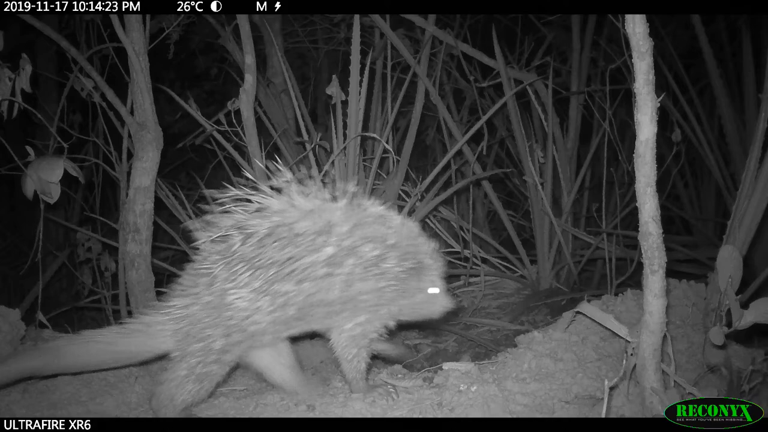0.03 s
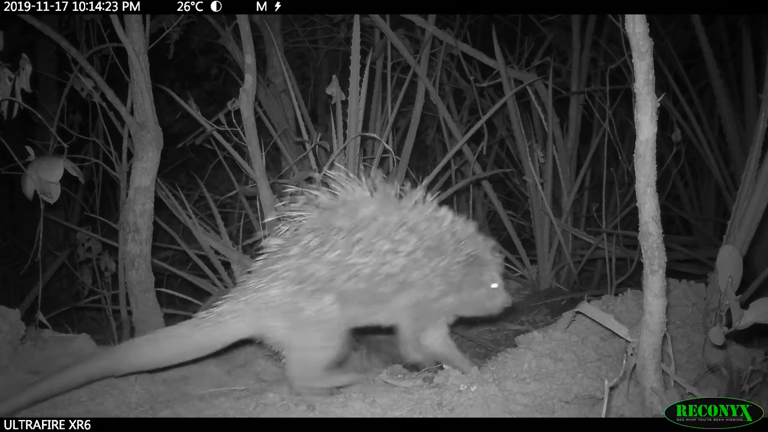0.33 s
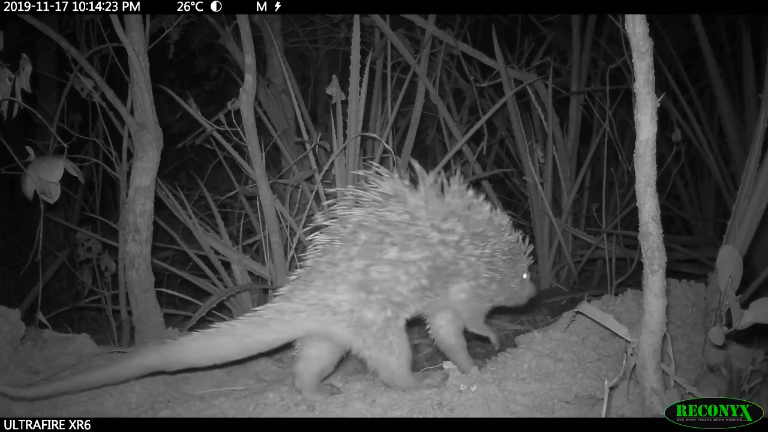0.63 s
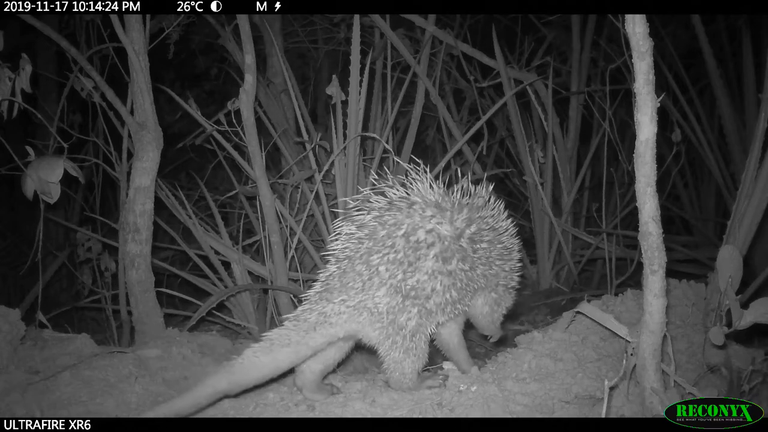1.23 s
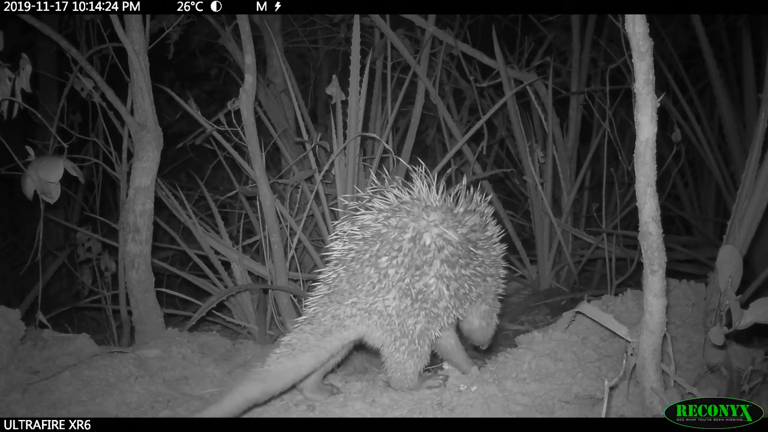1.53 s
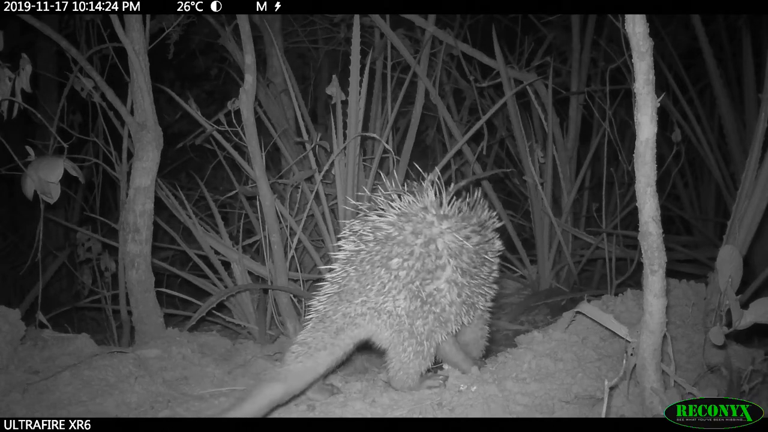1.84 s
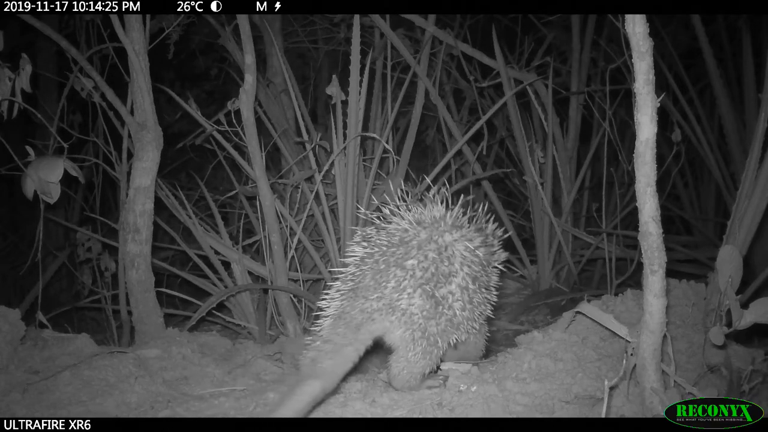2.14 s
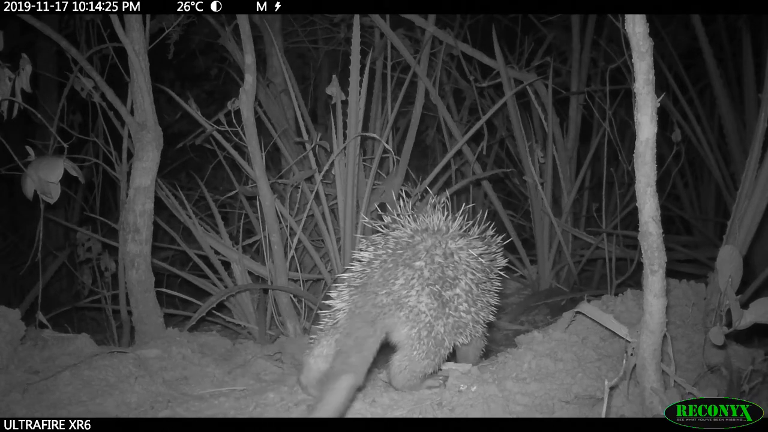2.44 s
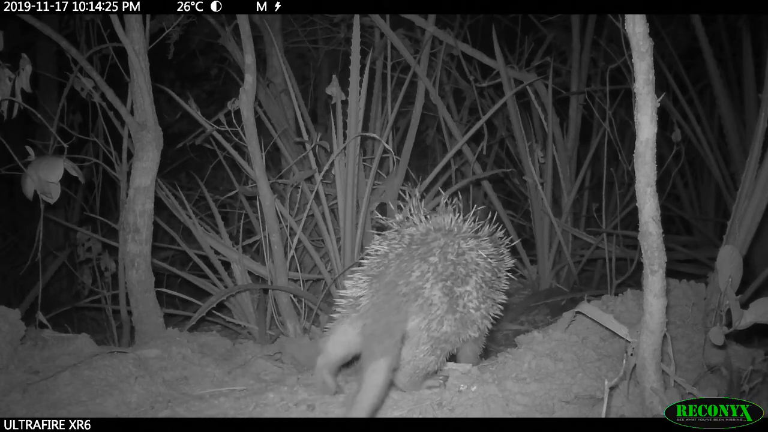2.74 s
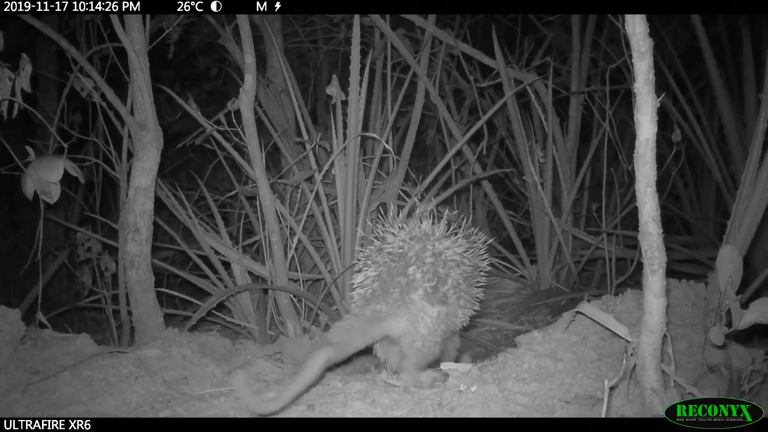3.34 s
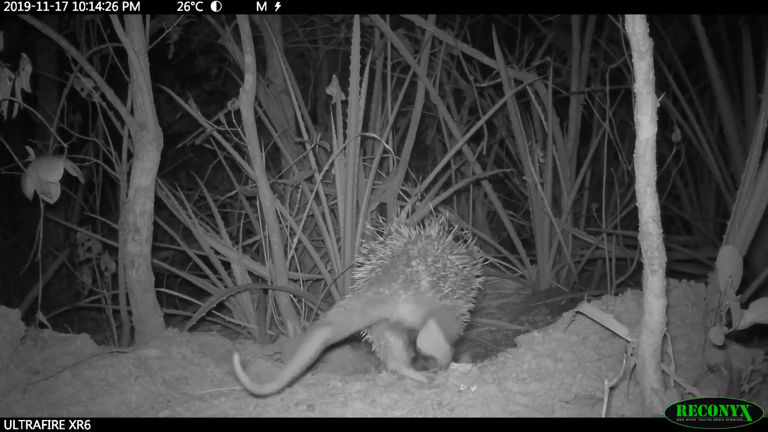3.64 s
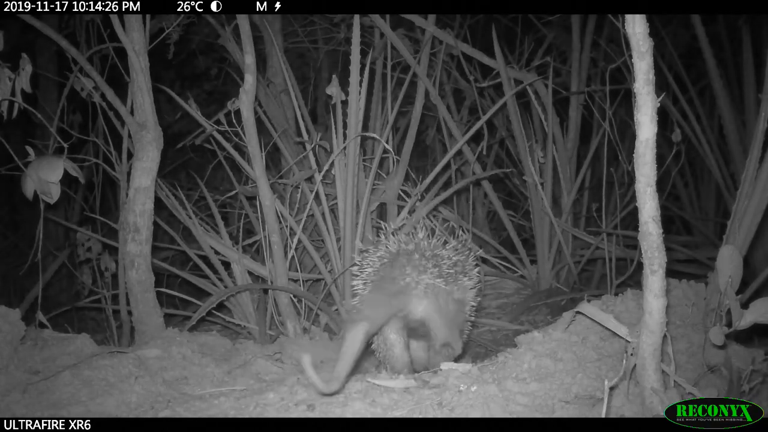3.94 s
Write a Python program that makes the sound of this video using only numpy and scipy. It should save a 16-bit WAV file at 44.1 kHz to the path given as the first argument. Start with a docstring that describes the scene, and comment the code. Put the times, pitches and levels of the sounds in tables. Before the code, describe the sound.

A chorus of crickets pulses near and far outdoors at night, starting with a soft microphone thump. A porcupine's feet and tail brush lightly through dry litter close by, ending in one short, sharp snap.

```python
"""A soft thump as a trail camera switches on, then a forest at night: three near crickets trill in
overlapping waves and a lower one purrs further off, each wing stroke a short tone. A distant chorus,
a high insect hiss and a low rush of air lie behind them. A porcupine shuffles away over dry litter,
its feet and tail brushing out grainy noise, and near the end something brittle snaps and briefly rings."""
import sys
import numpy as np
from scipy import signal
from scipy.fft import rfft, irfft, next_fast_len
from scipy.io import wavfile
from scipy.ndimage import map_coordinates

SR = 44100
rng = np.random.default_rng(int(sys.argv[2]) if len(sys.argv) > 2 else 0)


def generate_wav(signal):
    """Clip the signal to [-1, 1] and save it as 16-bit WAV at the path in sys.argv[1]."""
    frames = np.transpose(np.atleast_2d(signal))
    scaled = np.clip(frames, -1, 1) * 32767
    pcm = np.round(scaled).astype(np.int16)
    wavfile.write(sys.argv[1], SR, pcm)


N = 176400
T = np.arange(N) / SR

# Spectra of the noise sources. Each row: frequency in Hz, relative level in dB.
AIR_SPECTRUM = [(20, 28), (35, 8.5), (60, 17.5), (120, 6), (200, 3.5), (340, 2), (500, -1), (1200, -4),
                (2400, -5.5), (5000, -7), (10000, -8), (15000, -8.5)]
HISS_SPECTRUM = [(5000, -24), (8000, -4), (10000, -3), (12000, 0), (13500, 0), (15000, 2), (16000, -2.5)]
LITTER_SPECTRUM = [(700, -37), (2600, -8), (4000, -7.5), (5500, 7.5), (7500, 5), (10000, -8.5),
                   (15000, -32)]
SOIL_SPECTRUM = [(200, -13), (700, 1), (1400, 3.5), (2600, 2.5), (4000, -8), (7000, 8), (15000, -20)]
FOOTFALL_SPECTRUM = [(100, -52), (250, -4), (350, 4), (600, -17), (1100, -8), (2000, -23), (5000, -28)]
# Distant crowds of crickets. Each row: pitch in Hz, spread in Hz, level in dB, pulses per second.
CROWDS = [(2926, 64, -60, 24), (3110, 143, -61.5, 45), (3500, 110, -57.5, 37), (5870, 51, -62.5, 180),
          (6330, 150, -56, 24), (6664, 160, -51, 64), (7180, 110, -59, 100)]
# Calls of a hissing bush cricket and of a thin, very high insect.
# Each row: start in seconds, length in seconds, level in dB.
HISS_BOUTS = [(-.45, 0.74, -55), (.81, 0.62, -57), (2.15, .82, -56.5), (3.55, .8, -54.5)]
WHISTLES = [(-.45, .92, -66.5), (1.012, 0.81, -63.5), (2.452, 0.92, -65)]
# Feet and tail brushing the litter. Each row: middle in seconds, half length in seconds,
# level of the leaves in dB, level of the soil relative to the leaves in dB.
SHUFFLES = [(0.163, 0.072, -61.5, 0.5), (0.333, 0.02, -52, -9), (0.744, 0.039, -59, -18),
            (3.15, 0.027, -55.5, -13), (3.487, 0.025, -49, -1.5), (3.54, 0.011, -48.5, -5.5),
            (3.604, 0.027, -45.5, -7.5), (3.658, 0.0041, -52.5, -4), (3.751, 0.0055, -59, 7),
            (3.794, .014, -55.5, -7), (3.848, 0.0038, -52, -12)]
# Ticks of leaves and grit. Each row: start in seconds, level in dB.
TICKS = [(.1262, -45), (0.3245, -44), (.7265, -44), (2.9665, -45.5), (3.4817, -46), (3.5018, -38),
         (3.575, -38), (3.7707, -40)]
# A soft step on earth. One row: middle in seconds, half length in seconds, level in dB.
FOOTFALL = (3.11, 0.032, -57.5)
# The cracks of the snap and their echo. Each row: start in seconds, level in dB.
CRACKS = [(3.8868, -10.5), (3.8875, -16), (3.891, -27), (3.8958, -27.5)]
# Modes of the snap. Each row: frequency in Hz, relative level in dB, time to fall 60 dB in seconds.
SNAP_MODES = [(1460, -35, 0.014), (3500, -48, 0.0011), (4700, -36, 0.0047), (5280, -14, 0.0067),
              (6685, 3, 0.0065), (8200, -3, 0.0017), (9800, -45, .003)]
# Trills of the nearest cricket, a higher one, a softer neighbour and the low one.
# Each row: start in seconds, length in seconds, base level in dB.
LEAD_TRILLS = [(.345, 1.03, -41), (1.6, 0.86, -45), (2.845, 0.88, -47.5)]
HIGH_TRILLS = [(-.6, 0.75, -38.5), (.66, 0.85, -44.5), (1.93, 0.82, -46.5), (3.18, .86, -50)]
SOFT_TRILLS = [(.72, 0.52, -48), (2.12, 0.99, -50.5), (3.72, 0.67, -57.5)]
LOW_TRILLS = [(0, 1.04, -54.5), (1.15, 1, -54.5), (2.34, 0.706, -54), (3.06, 0.565, -59), (3.72, 0.25, -54)]


def amp(db):
    """Amplitude grows tenfold for every 20 dB."""
    return 10 ** (np.asarray(db) / 20)


def unit(x):
    """Normalisation to an rms of 1."""
    return x / np.sqrt(np.mean(x ** 2) + 1e-20)


def wobble(rate):
    """Smooth random modulation through `rate` knots per second."""
    return map_coordinates(rng.standard_normal(4096), [T * rate], mode="wrap")


def filtered(x, response):
    """Linear filtering: the spectrum times a frequency response."""
    size = next_fast_len(N + SR // 2)
    return irfft(rfft(x, size) * response(np.fft.rfftfreq(size, 1 / SR)), size)[..., :N]


def coloured(x, spectrum):
    """Spectral shaping through (Hz, dB) points, at an rms of 1."""
    f, db = np.transpose(spectrum)
    return unit(filtered(x, lambda hz: amp(np.interp(np.log(hz + 1), np.log(f), db))))


def noise(width):
    """Mid-side stereo white noise; width is the ratio of side to mid."""
    mid, side = rng.standard_normal((2, N))
    return unit(np.array([mid + width * side, mid - width * side]))


def gate(start, length, attack_s, release_s):
    """A trapezoidal envelope: attack, hold and release."""
    return np.clip((T - start) / attack_s, 0, 1) * np.clip((start + length - T) / release_s, 0, 1)


def swell(middle, half, db):
    """A Gaussian envelope for one stroke."""
    return amp(db) * np.exp(-.5 * ((T - middle) / half) ** 2)


def undergrowth(x, wet_db, t60, width):
    """Scattering from stems and leaves adds a decaying tail to the direct sound."""
    tail = (noise(width) * amp(-60 * T / t60))[:, :SR // 2]
    tail /= np.sqrt(np.sum(tail ** 2) / 2)
    scatter = signal.fftconvolve(x[None], tail, axes=1)[:, :N]
    return (x + amp(wet_db) * scatter) / np.sqrt(1 + amp(2 * wet_db))


def night_air():
    """Stationary noise weighted to low frequencies is heard as a steady rush."""
    return amp(-50.5) * coloured(noise(0.63), AIR_SPECTRUM)


def chorus():
    """Incoherent summation: many far crickets blur into narrow, fluttering bands of noise."""
    out = np.zeros((2, N))
    for hz, spread, db, rate in CROWDS:
        width = 1.5 if hz < 4500 else .8
        band = unit(filtered(noise(width), lambda f: (1 + ((f - hz) / (2.36 * spread)) ** 2) ** -1.5))
        flutter = 1 + 0.15 * np.sin(2 * np.pi * (rate * T + 0.43 * wobble(7)))
        out += band * unit(flutter) * amp(db + 0.23 * wobble(3.7))
    return out


def shrill(pitch, spread_hz):
    """Line broadening: slow noise modulates a tone into a fuzzy band around its pitch."""
    blur = unit(filtered(noise(0.93), lambda f: 1 / (1 + (f / spread_hz) ** 2)))
    return unit(blur * np.sin(2 * np.pi * np.cumsum(pitch) / SR))


def high_insects(edge_hz=15000, climb_hz=2000, climb_s=0.29, whistle_hz=11950, sag_hz=1100, sag_s=0.2):
    """Exponential glides over broadband hiss: a bush cricket's bright edge climbs, a whistle sinks."""
    out = np.zeros((2, N))
    hiss = amp(-1) * coloured(noise(1), HISS_SPECTRUM)
    for start, length, db in HISS_BOUTS:
        age = np.maximum(T - start, 0)
        edge = amp(-9) * shrill(edge_hz - climb_hz * np.exp(-age / climb_s), spread_hz=440)
        edge *= gate(start, length, attack_s=0.013, release_s=.03)
        lingering_hiss = hiss * gate(start, length + 0.094, attack_s=0.084, release_s=0.21)
        out += amp(db) * (lingering_hiss + edge)
    for start, length, db in WHISTLES:
        age = np.maximum(T - start, 0)
        whistle = shrill(whistle_hz + sag_hz * np.exp(-age / sag_s), spread_hz=280)
        whistle *= amp(-3.5 + 1.2 * wobble(50))
        out += amp(db) * (whistle + hiss) * gate(start, length, attack_s=0.23, release_s=0.048)
    return out * amp(0.55 * wobble(19)) * amp([[-1.5], [1.5]])  # leans to the right


def porcupine():
    """Friction on litter and soil gives grainy noise; small impacts give ticks and a soft footfall."""
    leaves = coloured(noise(0.36) * amp(2.5 * wobble(900)), LITTER_SPECTRUM)
    leaves *= sum(swell(middle, half, db) for middle, half, db, _ in SHUFFLES)
    soil = coloured(noise(0.083) * amp(3.7 * wobble(500)), SOIL_SPECTRUM)
    soil *= sum(swell(middle, half, db + soil_db) for middle, half, db, soil_db in SHUFFLES)
    ticks = coloured(noise(0.31), LITTER_SPECTRUM)
    ticks *= sum(amp(db - 60 * np.abs(T - start) / 0.018) * (T >= start) for start, db in TICKS)
    footfall = coloured(noise(0.084), FOOTFALL_SPECTRUM) * swell(*FOOTFALL)
    return leaves + soil + ticks + footfall


def snap():
    """Brittle fracture close by: a double crack excites heavily damped modes."""
    out = np.zeros(N)
    for start, db in CRACKS:
        age = np.maximum(T - start, 0)
        onset = 1 - np.exp(-age / .00008)
        ring = sum(amp(level - 60 * age / t60) * np.sin(2 * np.pi * hz * age)
                   for hz, level, t60 in SNAP_MODES)
        out += amp(db) * onset * ring
    return undergrowth(out, wet_db=-11, t60=.045, width=1.2)


def cricket(trills, hz, stroke_rate, duty, sag_hz, climb_hz, climb_s,
            attack_s, release_s, arch_db, jitter, waver_hz, accent_db=0, accent_s=0.08):
    """Stridulation: each wing stroke is a tone that sags; a trill starts flat and climbs to pitch."""
    out = np.zeros(N)
    for start, length, db in trills:
        age = np.maximum(T - start, 0)
        strokes = stroke_rate * age + jitter * wobble(12)
        progress = np.minimum(strokes % 1 / duty, 1)  # 0 to 1 while a stroke sounds
        pitch = hz - sag_hz * progress ** 2 - climb_hz * np.exp(-age / climb_s) + waver_hz * wobble(110)
        pulses = unit(np.sin(np.pi * progress) * np.sin(2 * np.pi * np.cumsum(pitch) / SR))
        arch = arch_db * (np.sin(np.pi * np.minimum(age / length, 1)) - 1)
        accent = accent_db * np.exp(-(age / accent_s) ** 2)  # the cricket digs in at the start
        out += pulses * gate(start, length, attack_s, release_s) * amp(db + arch + accent + wobble(45))
    return out


def near_crickets():
    """The ratio of scattered to direct sound sets four singers at their own depths in the undergrowth."""
    lead = cricket(LEAD_TRILLS, hz=6789, stroke_rate=58, duty=.9, sag_hz=466, climb_hz=260, climb_s=.05,
                   attack_s=0.014, release_s=0.044, arch_db=5, jitter=.08, waver_hz=23.9, accent_db=5)
    high = cricket(HIGH_TRILLS, hz=6907, stroke_rate=52, duty=.6, sag_hz=110, climb_hz=221.5,
                   climb_s=0.055, attack_s=.06, release_s=0.041, arch_db=-0.5, jitter=0.0614, waver_hz=20)
    soft = cricket(SOFT_TRILLS, hz=6425, stroke_rate=51, duty=0.57, sag_hz=111.5, climb_hz=80,
                   climb_s=0.0605, attack_s=0.034, release_s=.05, arch_db=1.5, jitter=0.054, waver_hz=17)
    low = cricket(LOW_TRILLS, hz=3623, stroke_rate=26, duty=.6, sag_hz=120, climb_hz=60.3,
                  climb_s=0.29, attack_s=.03, release_s=0.042, arch_db=1.3, jitter=.14, waver_hz=28.98)
    return (undergrowth(lead, wet_db=2.5, t60=.11, width=1.05)
            + undergrowth(high, wet_db=2.5, t60=.12, width=1.2)
            + undergrowth(soft, wet_db=6, t60=0.096, width=1.2)
            + undergrowth(low, wet_db=7, t60=0.1, width=1.46))


def scene():
    """Superposition: insects all round, the animal in front."""
    return near_crickets() + chorus() + high_insects() + night_air() + porcupine() + snap()


def record(dry):
    """A switch-on transient: the camera's bias jumps and settles with a thump; its band is limited."""
    on_s, rise_s, settle_s, top_hz = 0.1062, 0.011, 1.186, 15350
    age = np.maximum(T - on_s, 0)
    fade_in = np.clip(age / rise_s, 0, 1)
    bias = -0.033 + amp(-23) * np.exp(-age / settle_s)
    return filtered(fade_in * (dry + bias), lambda hz: hz < top_hz)


dry = scene()
out = record(dry)
generate_wav(out)
```